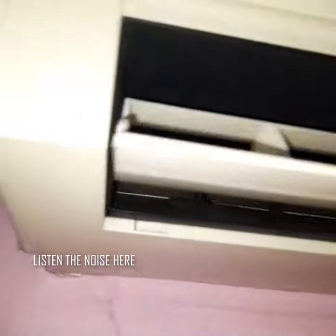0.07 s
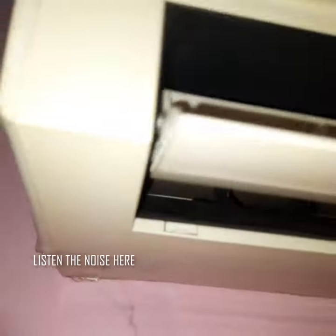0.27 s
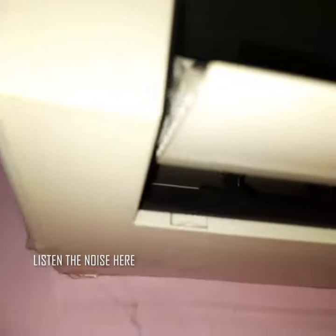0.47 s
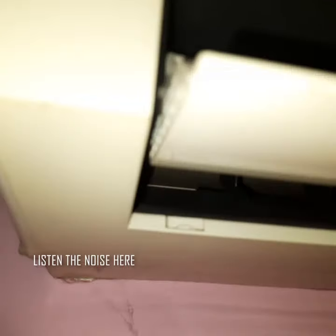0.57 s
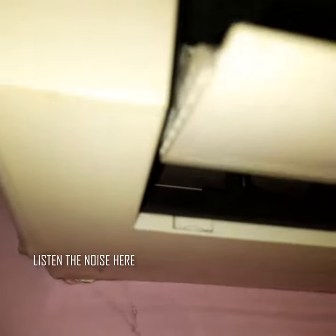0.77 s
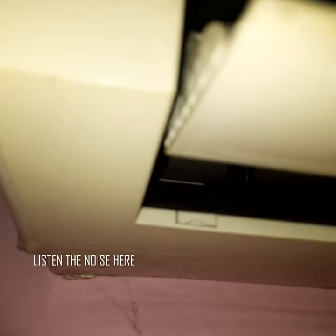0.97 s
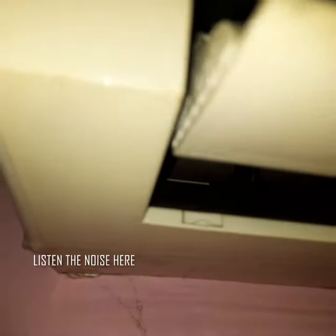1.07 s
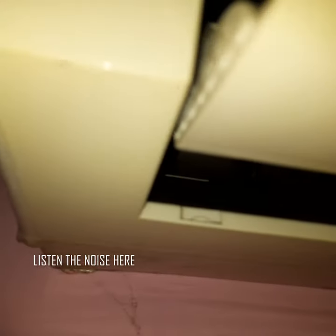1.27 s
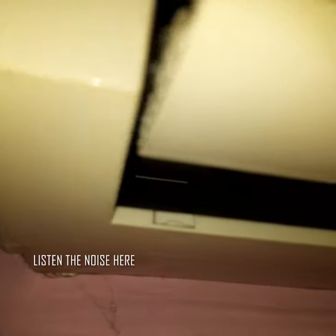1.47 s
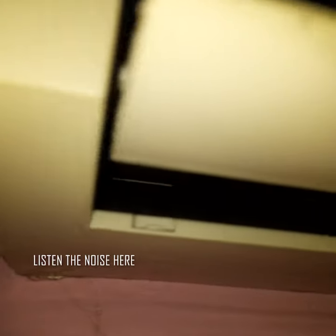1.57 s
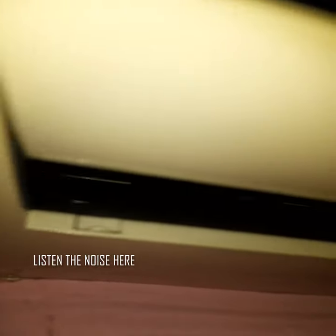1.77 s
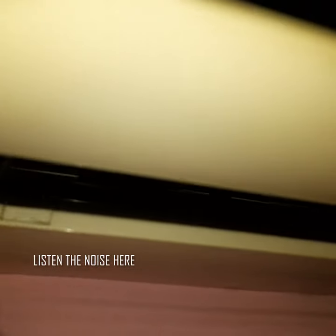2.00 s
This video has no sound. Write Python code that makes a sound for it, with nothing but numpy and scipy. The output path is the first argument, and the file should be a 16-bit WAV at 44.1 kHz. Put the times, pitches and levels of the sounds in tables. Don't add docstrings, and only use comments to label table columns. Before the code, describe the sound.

Air conditioner breeze buffets a close hand-held stereo microphone indoors. A strong low thud and gritty rasps open the first 0.2 seconds, then softer rumble and flutter continue, with bass briefly dropping out on either side. Faint steady fan hiss grows slightly nearer. Dry plastic louver ticks and knocks come irregularly, clearest around 1.57, 1.76 and 1.95 seconds. Heavy gusts and rasps return from 1.75 to the end.

```python
import sys
import numpy as np
from scipy import signal
from scipy.io import wavfile
from scipy.ndimage import uniform_filter1d

SR = 44100
rng = np.random.default_rng(int(sys.argv[2]) if len(sys.argv) > 2 else 0)


def put_to_file(sound):
    columns = np.atleast_2d(sound).T
    safe = np.clip(columns, -1, 1)
    whole_steps = np.round(safe * 32767)
    wavfile.write(sys.argv[1], SR, whole_steps.astype(np.int16))


def nominal_scale(level):
    x = np.asarray(level, float) / 20
    return 10 ** x


N = 89875
TIME_S = np.arange(N) / SR
FAN_LAG_S = .00042


def level(x):
    return x / np.sqrt(np.mean(x ** 2))


def band(x, hz, width_hz):
    return signal.lfilter(*signal.iirpeak(min(hz, .45 * SR), hz / width_hz, SR), x)


def band_twice(x, hz, width_hz, second_width_hz):
    return band(band(x, hz, width_hz), hz, second_width_hz)


def butter(x, order, hz, kind="low"):
    return signal.sosfilt(signal.butter(order, hz, kind, fs=SR, output="sos"), x)


def butter_both_ways(x, order, hz, kind="low"):
    return signal.sosfiltfilt(signal.butter(order, hz, kind, fs=SR, output="sos"), x)


def walk(rate_hz, channels=1):
    hold = int(SR / rate_hz)
    steps = np.repeat(rng.standard_normal((channels, N // 100)), hold, axis=1)[:, :N]
    return level(uniform_filter1d(uniform_filter1d(steps, hold), hold))


def pair(share, lag_s):
    common, left, right = rng.standard_normal((3, N))
    heard_by_both = np.array([np.roll(common, round(lag_s * SR)), common])
    return share * heard_by_both + np.sqrt(1 - share ** 2) * np.array([left, right])


def curve(table, index):
    return np.interp(TIME_S, np.array(table)[:, 0], np.array(table)[:, index])


def sides(table):
    pan_db = curve(table, index=2) / 2
    return nominal_scale(curve(table, index=1) + np.array([pan_db, -pan_db]))


def decay(t, t60_s):
    return np.exp(-np.log(1000) * t / t60_s)


# t/s, level/dB
NEAR = [(0, -50), (.3, -49.5), (1.46, -46.5), (1.74, -43.5), (2.03, -44)]
# f/Hz, level/dB per Hz
FAN = [(500, -9.5), (1000, -5), (2100, -14.5), (3000, -21.5), (3500, -25.5), (6000, -32.5), (8200, -36.5)]
FAN_DB, AIR_DB, FAN_TOP_HZ, FAN_SHARED = 0.5, -31.5, 8360, .6
SWELL_DB, SWELL_RATE_HZ, FLICKER_DB, FLICKER_RATE_HZ = .7, 30, .8, 30


def fan():
    hiss, swell_db = 0, SWELL_DB * walk(SWELL_RATE_HZ)
    point_hz, point_db = np.transpose(FAN)
    for hz in 500 * 2 ** np.arange(0, 4.1, 1 / 4):
        colour_db = np.interp(np.log(hz), np.log(point_hz), point_db)
        flicker_db = FLICKER_DB * walk(FLICKER_RATE_HZ)
        noise = band_twice(pair(FAN_SHARED, FAN_LAG_S), hz, hz / 4, hz / 4)
        hiss = hiss + nominal_scale(colour_db + swell_db + flicker_db) * noise
    hiss = level(butter(hiss, 8, FAN_TOP_HZ))
    air = butter(pair(FAN_SHARED, FAN_LAG_S), 4, FAN_TOP_HZ, "high")
    return (hiss + nominal_scale(AIR_DB + swell_db) * air) * nominal_scale(curve(NEAR, index=1) + FAN_DB)


def small_eddies():
    per_s, spread_db, shared = 350, 2.3, .5
    hit, size, sign = rng.random((3, 3, N))
    sizes = nominal_scale(-spread_db * np.log(size + 1e-9))
    pushes = (hit < per_s / SR) * sizes * np.sign(sign - .5)
    pushes = uniform_filter1d(pushes, size=60)
    return shared * pushes[0] + np.sqrt(1 - shared ** 2) * pushes[1:]


# t/s, level/dB, left over right/dB
BUFFET = [(0, -24, -4), (.06, -23.5, -10), (.2, -30.5, 3), (.35, -39, -3), (.5, -40, 7), (.62, -28.5, -2),
          (.85, -40.5, 3.5), (1.1, -33, -0.5), (1.25, -33.5, 3.5), (1.45, -38, 1), (1.65, -26.5, 4.5),
          (1.75, -31.5, -10), (1.875, -27, -10.5), (1.93, -28, -4), (2.03, -26.5, -12.5)]
RUMBLE_DB, RUMBLE_HZ, RUMBLE_WIDTH_HZ, RUMBLE_WALK_DB = -4.5, 92, 115, 2
SWAY_DB, SWAY_HZ, SWAY_WIDTH_HZ = -5, 57.3, 56


def rumble(gust):
    pushes = small_eddies() * nominal_scale(RUMBLE_WALK_DB * gust)
    shake = level(band_twice(pushes, RUMBLE_HZ, RUMBLE_WIDTH_HZ, 2 * RUMBLE_WIDTH_HZ))
    sway = level(band_twice(pushes, SWAY_HZ, SWAY_WIDTH_HZ, 2 * SWAY_WIDTH_HZ))
    return nominal_scale(RUMBLE_DB) * sides(BUFFET) * (shake + nominal_scale(SWAY_DB) * sway)


# t/s, level/dB, left over right/dB
DRAUGHT = [(0.0, -35.5, 4), (0.04, -34, 0.5), (0.07, -45, 15), (0.15, -43, -4.5), (0.3, -42.5, 0.5),
           (0.85, -40.5, -1), (0.91, -36, -2.5), (0.95, -43.5, 4), (0.97, -41.5, -1), (1.83, -34.5, 2),
           (1.89, -28.5, 5.5), (1.9, -37, 8), (1.96, -30, 3.5), (2.03, -39, 9.5)]
# f/Hz, width/Hz, level/dB
CAVITY = [(233, 113, 4), (343.5, 107, 3.5), (482, 268, -7.5), (797, 208, -10.5)]
FLUTTER_DB, FLUTTER_SHARED = 3.5, 0.57
FLUTTER_WALK_DB, FLUTTER_RATE_HZ, FLUTTER_GUST_DB = 2, 60, 2


def flutter(gust):
    hollow = 0
    for hz, width_hz, db in CAVITY:
        noise = pair(FLUTTER_SHARED, FAN_LAG_S / 2)
        hollow = hollow + nominal_scale(db) * band_twice(noise, hz, width_hz, 2 * width_hz)
    unsteady_db = FLUTTER_WALK_DB * walk(FLUTTER_RATE_HZ, channels=2) + FLUTTER_GUST_DB * gust
    return nominal_scale(FLUTTER_DB) * sides(DRAUGHT) * level(hollow * nominal_scale(unsteady_db))


# t/s, peak level/dB, swirl f/Hz
EDDIES_LEFT = [(0.034, -11.0, 148), (0.116, -23.5, 162), (0.166, -25.2, 186), (0.212, -20.4, 116),
               (0.235, -30.4, 187), (0.257, -27.2, 121), (0.277, -25.1, 99), (0.365, -25.1, 126),
               (0.398, -24.7, 116), (0.436, -25.4, 92), (0.481, -24.8, 131), (0.55, -22.2, 111),
               (0.589, -23.3, 105), (0.608, -20.6, 130), (0.63, -25.6, 91), (0.648, -23.5, 108),
               (0.681, -18.5, 97), (0.762, -23.7, 114), (0.816, -28.4, 190), (0.898, -28.1, 149),
               (0.931, -23.5, 107), (0.961, -27.1, 79), (1.038, -25.7, 108), (1.057, -26.7, 118),
               (1.086, -26.8, 164), (1.124, -27.0, 108), (1.153, -22.3, 103), (1.24, -25.6, 166),
               (1.272, -24.0, 145), (1.301, -27.1, 108), (1.384, -22.4, 114), (1.403, -27.5, 185),
               (1.478, -23.4, 105), (1.513, -22.4, 123), (1.533, -24.3, 200), (1.573, -20.0, 116),
               (1.604, -22.0, 106), (1.645, -19.4, 158), (1.678, -24.3, 178), (1.744, -20.5, 101),
               (1.803, -15.6, 138), (1.862, -17.4, 142), (1.88, -22.4, 109), (2.016, -20.1, 146),
               (1.761, -21, 120),
    (1.787, -19, 160),
    (1.818, -15, 130),
    (1.846, -19, 210),
    (2.004, -20, 230),
    (2.03, -24, 200),
]
EDDIES_RIGHT = [(0.032, -15.2, 127), (0.074, -20.7, 110), (0.115, -15.3, 118), (0.155, -18.9, 160),
                (0.184, -22.3, 144), (0.215, -24.1, 98), (0.236, -23.8, 136), (0.274, -25.3, 108),
                (0.309, -26.9, 71), (0.372, -27.4, 130), (0.395, -25.6, 151), (0.424, -23.9, 141),
                (0.481, -23.7, 106), (0.549, -28.4, 131), (0.608, -21.0, 171), (0.646, -26.9, 165),
                (0.678, -20.1, 115), (0.731, -26.9, 130), (0.762, -22.9, 139), (0.816, -26.5, 186),
                (0.845, -29.1, 209), (0.957, -32.4, 170), (0.991, -32.9, 92), (1.018, -29.6, 104),
                (1.038, -27.8, 96), (1.058, -25.6, 141), (1.086, -27.5, 153), (1.126, -28.6, 120),
                (1.154, -21.5, 116), (1.279, -27.0, 93), (1.361, -29.4, 103), (1.382, -25.6, 132),
                (1.402, -25.6, 199), (1.491, -24.1, 131), (1.565, -24.0, 115), (1.66, -20.8, 118),
                (1.723, -18.0, 80), (1.743, -16.1, 119), (1.761, -17.7, 106), (1.786, -17.3, 134),
                (1.804, -14.5, 129), (1.85, -10.8, 132), (1.876, -12.5, 111), (2.012, -10.1, 139),
                (.002, -19, 110),
    (1.822, -17, 110),
    (1.862, -14, 110),
    (1.892, -15, 90),
    (1.914, -18, 190),
    (1.973, -19, 120),
    (2.024, -14, 80),
    (2.039, -15, 80),
]
EDDY_CYCLES, EDDY_DB = 0.32, 0.5


def thuds():
    out = np.zeros((2, N))
    for port, eddies in enumerate((EDDIES_LEFT, EDDIES_RIGHT)):
        for (start_s, db, hz), turn in zip(eddies, rng.random(len(eddies))):
            cycles = (TIME_S - start_s) * hz
            swell = np.exp(-(cycles / EDDY_CYCLES) ** 2 / 2)
            out[port] += nominal_scale(db + EDDY_DB) * swell * np.cos(2 * np.pi * (cycles + turn))
    return out


# t/s, length/s, level/dB
RASPS = [(.037, .008, -38), (.067, .008, -40), (.078, .006, -37), (.084, .006, -34), (.092, .003, -30),
         (.119, .008, -42), (.159, .008, -37), (.33, .006, -41), (.61, .02, -49), (.875, .02, -46),
         (1.36, .02, -45), (1.523, .012, -43), (1.763, .01, -36), (1.864, .006, -29), (1.883, .004, -26),
         (1.888, .005, -27), (1.917, .006, -33), (1.94, .005, -33), (1.95, .004, -32), (1.955, .008, -28),
         (1.982, .005, -33), (2.004, .004, -30), (2.009, .005, -24)]
RASP_DB, RASP_HZ, RASP_WIDTH_HZ, RASP_EDGE_S = 2.5, 695, 1000, .0008


def rasps():
    grit = level(band_twice(rng.standard_normal(N), RASP_HZ, RASP_WIDTH_HZ, RASP_WIDTH_HZ))
    grit = grit * nominal_scale(2 * walk(340)[0])
    strength = np.zeros(N)
    for start_s, length_s, db in RASPS:
        t = np.clip(TIME_S - start_s, 0, None)
        strength += nominal_scale(db + RASP_DB) * np.minimum(t / RASP_EDGE_S, 1) * np.exp(-(t / length_s) ** 2)
    return np.array([grit * strength, np.zeros(N)])


def port_wind():
    gust = walk(55, channels=2)
    wind = rumble(gust) + flutter(gust) + thuds() + rasps()
    return butter_both_ways(wind, 2, 2600)


BLOW_S = np.arange(2600) / SR
SLIP_S, TICK_SCATTER_DB = .0008, 3


def ring(modes, scatter):
    out = 0
    for (hz, db, t60_s), chance in zip(modes, scatter):
        tone = np.sin(2 * np.pi * hz * (1 + chance / 200) * BLOW_S)
        out = out + nominal_scale(db + TICK_SCATTER_DB * chance) * decay(BLOW_S, t60_s) * tone
    return out * np.minimum(BLOW_S / SLIP_S, 1)


def crack(db, hz, width_hz):
    count = len(BLOW_S)
    burst = rng.standard_normal(count) * decay(BLOW_S, .022) * np.minimum(BLOW_S / SLIP_S, 1)
    ragged = nominal_scale(TICK_SCATTER_DB * np.repeat(rng.standard_normal(count // 50), 50))
    return nominal_scale(db) * band_twice(burst * ragged, hz, width_hz, width_hz)


def housing_tail(x):
    t = np.arange(6000) / SR
    tail = rng.standard_normal((2, len(t))) * decay(t, .1)
    tail = tail / np.sqrt(np.sum(tail ** 2, axis=1, keepdims=True))
    return x + nominal_scale(-10) * signal.fftconvolve(x, tail, axes=1)[:, :x.shape[1]]


# t/s, peak level/dB, louver knock level over the tick/dB
TICKS = [(0.165, -55.5, 7), (0.37, -42, 12), (0.5385, -53, 0), (0.5553, -50, 10), (0.677, -48.5, 11),
         (0.695, -53.5, 24), (0.784, -45.5, 8), (0.8331, -43, 11), (0.9742, -57, 7), (1.028, -57, -3),
         (1.066, -44.5, 13), (1.1107, -48, 13), (1.159, -59, -8), (1.2315, -46, 7), (1.363, -52, 16),
         (1.5664, -37.5, 13), (1.7593, -36, 15), (1.9488, -36.5, 9)]
# f/Hz, level/dB, 60 dB decay/s
TOOTH = [(4120, -14, .018), (4700, -12, .015), (6350, -1, .022), (7760, -12, .012), (8350, -12, .012)]
# f/Hz, level/dB, 60 dB decay/s
LOUVER = [(1050, -2, .014), (1430, 0, .016), (1800, -1, .014), (2200, -4, .012), (2700, -6, .012),
          (3400, -10, .012)]
TICK_DB, KNOCK_DB, TICK_LAG_S, KNOCK_LATE_S, TICK_TOP_HZ = -6, -8, .00045, .003, 9500


def louver():
    out = np.zeros((2, N + 4000))
    chances = rng.standard_normal((len(TICKS), 2, 16))
    for (start_s, db, knock_db), (first, other) in zip(TICKS, chances):
        for port, scatter in enumerate((first, (first + other / 2) / np.sqrt(5 / 4))):
            i = int((start_s + TICK_LAG_S * (1 - port)) * SR)
            j = i + int(KNOCK_LATE_S * SR)
            tick = ring(TOOTH, scatter) + crack(2, hz=6800, width_hz=4000)
            knock = ring(LOUVER, scatter[::-1]) / 2 + crack(2, hz=1900, width_hz=2400)
            out[port, i:i + len(tick)] += nominal_scale(db + TICK_DB) * tick
            out[port, j:j + len(knock)] += nominal_scale(db + knock_db + KNOCK_DB) * knock
    return housing_tail(butter(out, 2, TICK_TOP_HZ))[:, :N]


def bump(centre_s, half_s, edge_s):
    outside_s = np.abs(TIME_S - centre_s) - half_s
    return 1 / (1 + np.exp(np.clip(outside_s / edge_s * 4, -50, 50)))


# t/s, length/s, depth level/dB
CUT_LEFT = [
    (.057, .048, -20),
    (.135, .015, -13),
    (.178, .017, -15),
    (.328, .02, -12),
    (.495, .027, -16),
    (1.424, .012, -15),
    (1.7, .033, -17),
    (1.9, .1, -27),
]
CUT_RIGHT = [
    (.558, .027, -17),
    (.87, .085, -25),
    (1.17, .028, -16),
    (1.22, .042, -20),
    (1.3, .05, -18),
    (1.457, .014, -15),
    (1.5, .035, -21),
    (1.577, .023, -17),
]
CUT_HZ, CUT_EDGE_S = 270, .006


def wind_filter(x):
    high = butter_both_ways(x, 4, CUT_HZ, "high")
    keep = []
    for cuts in (CUT_LEFT, CUT_RIGHT):
        cut_db = sum(db * bump(s + length / 2, length / 2, CUT_EDGE_S) for s, length, db in cuts)
        keep.append(nominal_scale(cut_db))
    return high + np.array(keep) * (x - high)


def scene():
    return fan() + port_wind() + louver()


def roll_off(x):
    return signal.sosfilt(signal.butter(12, 15800, fs=SR, output="sos"), x)


def record(dry):
    mix = wind_filter(butter(dry, 2, 41, "high"))
    return roll_off(mix)


dry = scene()
out = record(dry)
put_to_file(out)
```